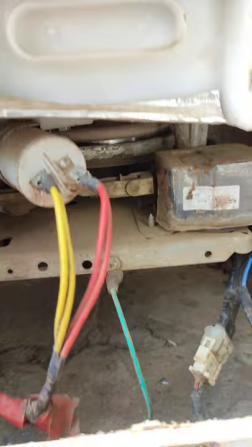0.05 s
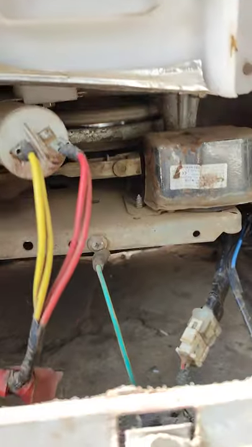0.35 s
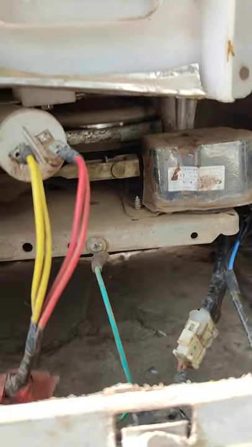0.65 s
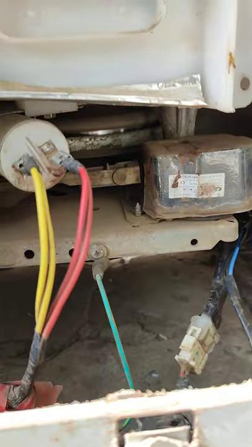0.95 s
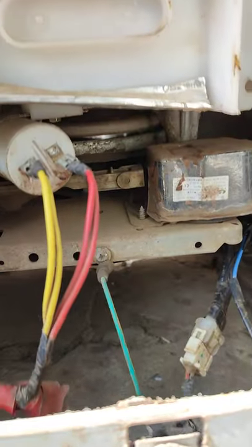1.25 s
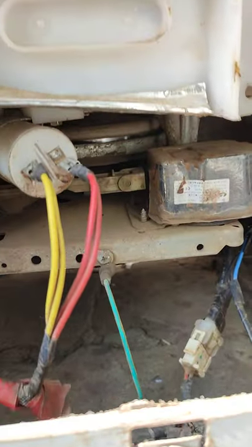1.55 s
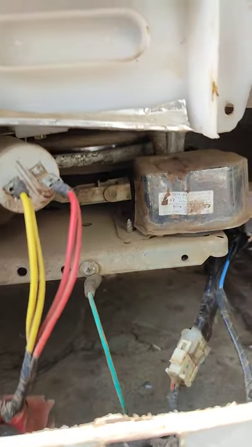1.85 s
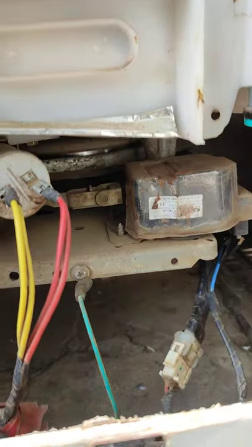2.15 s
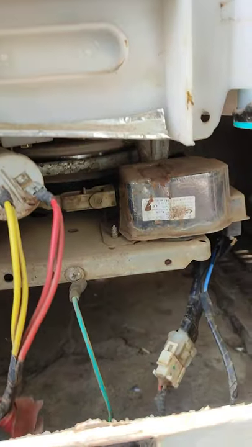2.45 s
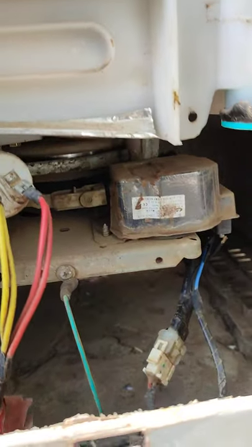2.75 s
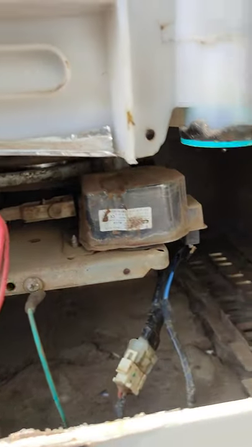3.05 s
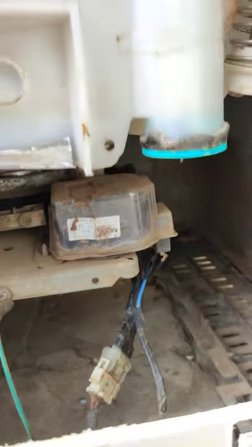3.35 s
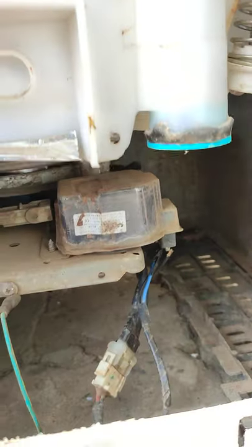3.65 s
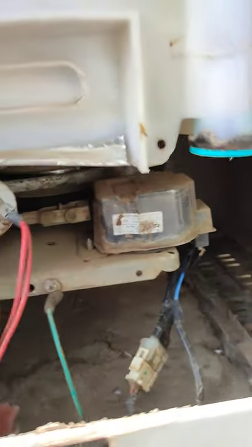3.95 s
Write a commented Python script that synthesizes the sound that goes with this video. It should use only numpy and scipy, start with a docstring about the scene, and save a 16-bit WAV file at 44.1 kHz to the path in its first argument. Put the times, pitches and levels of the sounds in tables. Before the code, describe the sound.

A washing machine drive thumps and rattles for the whole four seconds, about twelve even beats a second, close up inside the open cabinet. Each beat joins a hollow tub thump, a steel rattle and a thin scrape, over a low motor hum and rumble. A few faint metal ticks occur in the first 2.5 seconds. From about 1.7 seconds the rattle's tone shifts slightly while the pace holds.

```python
"""Inside the open cabinet of a running washing machine, close to the drive.
Once a turn, about twelve times a second, the pulley rubs and judders. This stick-slip friction excites
the modes of the plastic tub (a thump) and of the steel frame (a rattle), with a thin scrape on top and
an occasional tick of loose metal. The motor hums and rumbles underneath, the cabinet adds a short echo,
and the colour of the resonances shifts as the listening point moves along it."""
import sys
import numpy as np
from scipy import signal
from scipy.fft import rfft, irfft, next_fast_len
from scipy.io import wavfile
from scipy.ndimage import map_coordinates

SR = 44100
rng = np.random.default_rng(int(sys.argv[2]) if len(sys.argv) > 2 else 0)


def bounce(signal):
    """Save signal as a 16-bit WAV file at the path given by the first command-line argument."""
    frames = np.transpose(np.atleast_2d(signal))
    limited = np.clip(frames, -1, 1)
    pcm = np.round(limited * 32767).astype(np.int16)
    wavfile.write(sys.argv[1], SR, pcm)


N = 176400

# Levels in the tables are relative: each source applies its own gain.
# one rub of the pulley per turn: (time [s], tub level [dB], frame level [dB])
PULLEY_RUBS = [(0.034, -15, -15), (0.114, -16, -17), (0.203, -16, -17), (0.276, -16.5, -17.0),
               (0.354, -18, -16.5), (0.437, -16, -18), (0.521, -17, -19.0), (0.596, -18.5, -21.5),
               (0.679, -19.0, -17.0), (0.757, -17, -19.0), (0.84, -21.5, -17.5), (0.919, -16, -17),
               (0.999, -17.5, -18.5), (1.08, -17.0, -20.0), (1.163, -16.0, -17.0), (1.24, -14.5, -17),
               (1.323, -16.5, -18.0), (1.403, -17, -17.5), (1.484, -16.0, -18.0), (1.568, -20.0, -20),
               (1.642, -17, -17.5), (1.724, -16, -17.0), (1.804, -16, -21), (1.886, -18, -17.0),
               (1.963, -17.5, -18.5), (2.045, -21, -17.5), (2.126, -16, -17.5), (2.207, -17, -19.0),
               (2.289, -15.5, -18), (2.368, -16, -16.5), (2.45, -17.0, -18), (2.53, -18, -17.0),
               (2.611, -16.5, -15), (2.689, -18, -18), (2.774, -22.0, -16.5), (2.852, -19, -16),
               (2.932, -20, -17), (3.01, -19.5, -18.0), (3.091, -22.5, -17.5), (3.17, -15, -18),
               (3.252, -18.0, -17), (3.332, -16.0, -15.5), (3.411, -16.5, -16.0), (3.493, -19.5, -15),
               (3.575, -17.5, -16.0), (3.655, -17.0, -16), (3.734, -16.5, -16.5), (3.815, -16.5, -18.5),
               (3.897, -18, -17.5), (3.977, -18, -16.5)]
# modes of the plastic tub and of the steel frame: (frequency [Hz], bandwidth [Hz], level [dB],
# left minus right [dB], left phase lead [rad], gain at the far position [dB])
TUB_MODES = [(113.4, 21, -7, -5.5, 0.25, 0), (187.6, 47, -11, -1, 0.17, -2),
             (280.7, 37.3, -6, -5.5, 0.52, 0.5), (335.7, 41, 0, 0.5, 0.71, -2),
             (364.3, 58, -6, 6.5, 0.28, -1), (414.1, 22.6, -6, -10, 1.52, -1.5)]
FRAME_MODES = [(508.3, 29, -2.5, -5.5, -3, -5), (548.7, 37, 1.5, -0.5, -2.5, 2.5),
               (575, 30, -1.5, 13, -3, 1), (649.8, 34.5, -3.5, 6, 0.18, 2.5), (697.7, 75, -4, 8.5, 0.32, 2),
               (785, 29.8, -3.5, -1, 0.78, 2), (852, 53, -7, 8, 1.43, 1.5), (929.2, 35.7, -4.5, 4, -0.2, 5),
               (1092.5, 41.5, -9.5, -2.5, 1.75, 2), (1196.5, 32.6, -9, -1.5, 1.81, 1.5),
               (1488, 56, -19.5, -4.5, -1.3, 1)]
# broad ring of the panels between the frame's modes: (frequency [Hz], level [dB])
PANEL_SPECTRUM = [(250, -40), (480, 0), (700, 0), (1050, -4), (1300, -9), (1620, -8), (1850, -19.5),
                  (2800, -27.5), (4000, -31.5), (8000, -70)]
# friction noise of the pulley: (frequency [Hz], level [dB])
SCRAPE_SPECTRUM = [(900, -46), (1900, 8), (2800, 0), (3900, -12.5), (5100, -2), (6200, -6.5), (7500, -1.5),
                   (8600, -11), (9800, -19), (12500, -14), (14300, -38.5)]
# jolts of loose metal: (time [s], level [dB])
METAL_TICKS = [(0.1222, -38), (1.1663, -46), (1.4886, -47), (1.6477, -43), (1.8053, -42), (1.8901, -46),
               (2.2937, -44), (2.3825, -46)]
# colour of a tick: (frequency [Hz], level [dB])
TICK_SPECTRUM = [(1200, -32), (2500, 4), (5000, -8), (8000, -2), (10000, 12), (14000, 14)]
# tonal lines of the drive: (frequency [Hz], level [dB])
HUM_LINES = [(12.43, -39.5), (100, -32), (108, -31.5), (112.4, -36), (124.8, -31.5), (137.3, -37.5)]
# rumble of the shaking tub: (frequency [Hz], level [dB])
RUMBLE_SPECTRUM = [(20, -38), (48, -32), (68, -16), (85, -7), (104, 7), (125, -8), (150, -7.5), (190, 1),
                   (240, -13.5), (330, 0.5), (480, -27.5), (900, -62)]
# whirr of belt and bearings: (frequency [Hz], level [dB])
WHIRR_SPECTRUM = [(30, -41), (150, -18), (400, -0.5), (900, -4), (1400, -7), (2100, -16), (3900, -23),
                  (5200, -26.5), (7600, -25), (9800, -35), (14000, -32)]
# reverberation of the cabinet: (frequency [Hz], time to decay by 60 dB [s])
CABINET_T60 = [(150, 0.053), (1000, 0.056), (3000, 0.059), (12000, 0.027)]
# path of the listening point: (time [s], position [0 near, 1 far])
LISTENER_PATH = [(0, 0), (1.7, 0), (3.3, 0.93), (4, 0.34)]

TURN_HZ = 12.43
SLIPS_PER_S, SLIP_SCATTER_DB = 700, 3.5
RUB_SAMPLES, LEAD_S = 8192, .01  # the window of one rub opens LEAD_S before the catch


def pulley_thumps():
    """Forced vibration: each rub catches and slips, driving the tub and, more gradually, the frame."""
    out = np.zeros((2, N))
    t, hz = np.arange(RUB_SAMPLES) / SR, np.fft.rfftfreq(RUB_SAMPLES, 1 / SR)
    low_cut = lambda edge_hz: (1j * hz / (1j * hz + edge_hz)) ** 3
    tubs = [modal_response(TUB_MODES, contact_hz=610, position=p) * low_cut(53) for p in (0, 1)]
    frames = [modal_response(FRAME_MODES, contact_hz=1980, position=p) * low_cut(213) for p in (0, 1)]
    on_tub = contact_force(delay_s=-0.00054, attack_s=0.0014, hold_s=0.012, fall_db_per_s=563)
    on_frame = contact_force(delay_s=-0.0019, attack_s=0.0068, hold_s=0.0074, fall_db_per_s=498)
    catch = 1.96 * np.exp(-2j * np.pi * hz * LEAD_S)  # spectrum of the rub's opening impulse
    panel_colour, panel_decay = amp(log_interp(PANEL_SPECTRUM, hz)), amp(-60 * t / 0.12)
    for start_s, tub_db, frame_db in PULLEY_RUBS:
        position = np.interp(start_s, *np.transpose(LISTENER_PATH))
        tub, frame = [near + position * (far - near) for near, far in (tubs, frames)]
        slips = stick_slip()
        tub_force = catch + rfft(slips * on_tub)
        frame_force = .4 * catch + rfft(slips * on_frame)
        panels = rfft(rng.standard_normal((2, RUB_SAMPLES)) * panel_decay) * panel_colour
        thump = unit_per_turn(irfft(tub_force * tub))
        frame_ring = unit_per_turn(irfft(frame_force * frame))
        panel_ring = unit_per_turn(irfft(frame_force * panels))
        rattle = unit_per_turn(frame_ring + amp(-8) * panel_ring)
        add(out, start_s - LEAD_S, amp(tub_db - 0.25) * thump + amp(frame_db - 0.94) * rattle)
    return out


def stick_slip():
    """Stick-slip friction releases impulses of uneven spacing, size and direction."""
    gaps = rng.gamma(2, .5, 256)
    sizes = amp(SLIP_SCATTER_DB * rng.standard_normal(256))
    signs = rng.choice([-1, 1], 256)
    onsets = (np.cumsum(gaps) / SLIPS_PER_S * SR).astype(int)
    return np.bincount(onsets, signs * sizes, RUB_SAMPLES)[:RUB_SAMPLES]


def contact_force(delay_s, attack_s, hold_s, fall_db_per_s):
    """Transient contact: the force rises linearly, holds, then relaxes exponentially."""
    t = np.arange(RUB_SAMPLES) / SR - LEAD_S - delay_s
    return np.clip(t / attack_s, 0, 1) * amp(-fall_db_per_s * np.maximum(t - attack_s - hold_s, 0))


def modal_response(modes, contact_hz, position):
    """Modal superposition: the stereo spectrum of damped sinusoids, low-passed by a soft contact."""
    t, ear = np.arange(RUB_SAMPLES) / SR, np.array([[.5], [-.5]])
    ring = np.zeros((2, RUB_SAMPLES))
    for k, (hz, width_hz, db, pan_db, lead_rad, far_db) in enumerate(modes):
        envelope = width_hz * amp(db + ear * pan_db + position * far_db) * np.exp(-np.pi * width_hz * t)
        ring += envelope * np.sin(2 * np.pi * hz * t + ear * lead_rad + np.pi * k)  # signs alternate
    return rfft(signal.sosfilt(signal.butter(4, contact_hz, fs=SR, output="sos"), ring))


def pulley_scrape():
    """Friction noise: a gritty metallic hiss follows the contact force of each rub."""
    force = np.zeros(N)
    shape = contact_force(delay_s=-.003, attack_s=.013, hold_s=.022, fall_db_per_s=280)
    for start_s, _, frame_db in PULLEY_RUBS:
        add(force, start_s - LEAD_S, amp(frame_db + rng.normal(0, 1.3)) * shape)
    grit = amp(1.5 * wobble(160) + 1.6 * wobble(1600))
    hiss = force * grit * noise(SCRAPE_SPECTRUM, side_db=-1.2)
    return amp(-44.5) * steel_resonances(hiss) * amp([[-.8], [.8]])


def steel_resonances(x, ripple_db=2.7, spacing_hz=75):
    """High modal density: thin steel ripples the spectrum, differently at each ear and position."""
    def response(hz):
        knots = rng.standard_normal((2, 1024))
        ripple = np.array([map_coordinates(ear, [hz / spacing_hz], mode="mirror") for ear in knots])
        return amp(ripple_db * ripple)

    near, far = filtered(x, response), filtered(x, response)
    position = np.interp(np.arange(N) / SR, *np.transpose(LISTENER_PATH))
    return unit_rms(near + position * (far - near))


def metal_ticks():
    """Impact noise: now and then a rub jolts loose metal, which gives a brief, bright burst."""
    force = np.zeros(N)
    shape = contact_force(delay_s=0, attack_s=.001, hold_s=.004, fall_db_per_s=800)
    for start_s, db in METAL_TICKS:
        add(force, start_s - LEAD_S, amp(db) * shape)
    return amp(-62) * unit_rms(force * noise(TICK_SPECTRUM, side_db=-1))


def motor():
    """Rotating machinery gives tones and broadband noise: hum, tub rumble, belt and bearing whirr."""
    t, hum = np.arange(N) / SR, np.zeros(N)
    for hz, db in HUM_LINES:
        phase = 2 * np.pi * (hz * t + rng.random()) + 0.13 * wobble(2.59)
        hum += np.sqrt(2) * amp(db) * np.sin(phase)
    hum *= amp(0.95 * wobble(14) - 1.5)
    rumble = amp(-26.5) * noise(RUMBLE_SPECTRUM, side_db=-14.5) * amp(1.5 * wobble(12))
    whirr = amp(-35.5) * steel_resonances(noise(WHIRR_SPECTRUM, side_db=2)) * amp(2.16 * wobble(40))
    return (hum + rumble) * amp([[-1.5], [1.3]]) + whirr


def cabinet_echo(x):
    """Reverberation: the enclosure's reflections arrive after 12 ms and decay exponentially."""
    hz, t, bands = signal.stft(rng.standard_normal((2, SR // 4)), SR, nperseg=256)
    decay = amp(-60 * t / log_interp(CABINET_T60, hz)[:, None])
    tail = signal.istft(bands * decay, SR, nperseg=256)[1]
    tail = np.pad(tail / np.linalg.norm(tail[0]), ((0, 0), (round(.012 * SR), 0)))
    return signal.fftconvolve(x, tail, axes=1)[:, :N]


def amp(db):
    """Amplitude ratio of a level in decibels."""
    return 10 ** (np.asarray(db) / 20)


def unit_rms(x):
    """Normalisation to rms 1."""
    return x / np.sqrt(np.mean(x ** 2) + 1e-20)


def unit_per_turn(x):
    """Normalisation of a stereo burst to rms 1 over one turn."""
    return x / np.sqrt(np.sum(x ** 2) / 2 * TURN_HZ / SR)


def log_interp(points, hz):
    """Interpolation of (frequency, value) points on a logarithmic frequency axis."""
    knots_hz, values = np.transpose(points)
    return np.interp(np.log(hz + 1), np.log(knots_hz + 1), values)


def wobble(knots_per_s):
    """Random modulation: a smooth curve through Gaussian knots."""
    knots = rng.standard_normal(int(N * knots_per_s / SR) + 4)
    return map_coordinates(knots, [np.arange(N) * knots_per_s / SR])


def filtered(x, response):
    """Linear filtering: the spectrum is multiplied by a frequency response."""
    size = next_fast_len(N + SR // 2)
    return irfft(rfft(x, size) * response(np.fft.rfftfreq(size, 1 / SR)), size)[..., :N]


def noise(spectrum, side_db):
    """Mid-side synthesis of coloured stereo noise of rms 1."""
    mid, side = filtered(rng.standard_normal((2, N)), lambda hz: amp(log_interp(spectrum, hz)))
    return unit_rms(np.array([mid + amp(side_db) * side, mid - amp(side_db) * side]))


def add(track, start_s, sound):
    """Superposition of a sound on the track from start_s on."""
    i = max(0, round(start_s * SR))
    part = sound[..., :max(0, N - i)]
    track[..., i:i + part.shape[-1]] += part


def scene():
    """Superposition of the contact sounds, their echo and the motor."""
    contacts = pulley_thumps() + pulley_scrape() + metal_ticks()
    return contacts + amp(-20.5) * cabinet_echo(contacts) + motor()


def record(dry, ceiling=0.99, cutoff_hz=14400):
    """Soft saturation rounds the highest peaks; a low-pass filter limits the bandwidth."""
    soft = dry / (1 + np.abs(dry / ceiling) ** 10) ** (1 / 10)
    return filtered(soft, lambda hz: hz < cutoff_hz)


dry = scene()
out = record(dry)
bounce(out)
```